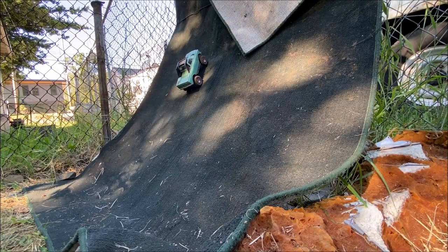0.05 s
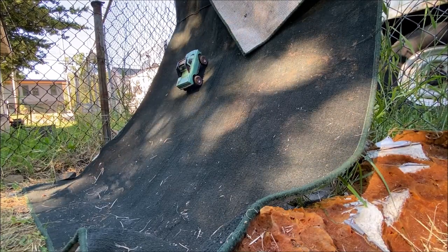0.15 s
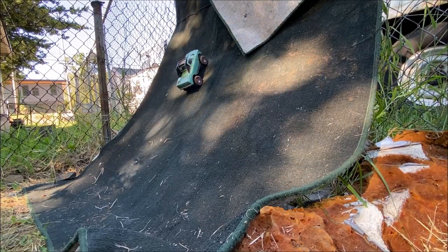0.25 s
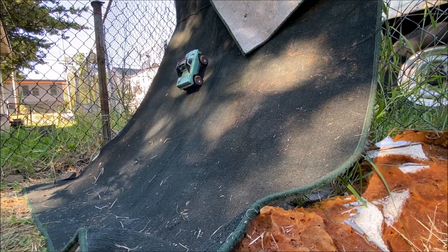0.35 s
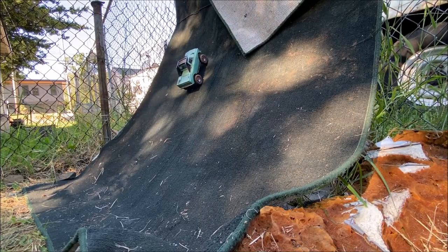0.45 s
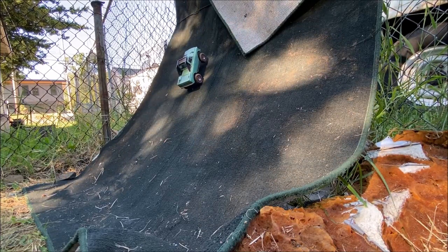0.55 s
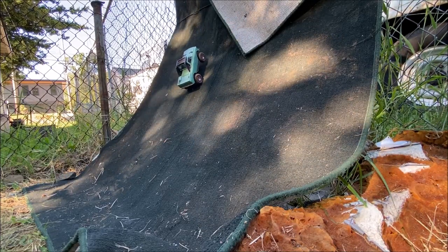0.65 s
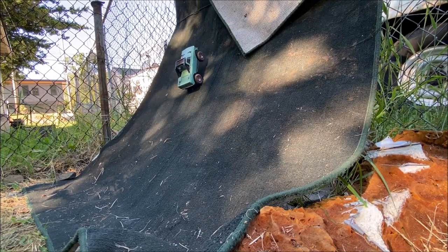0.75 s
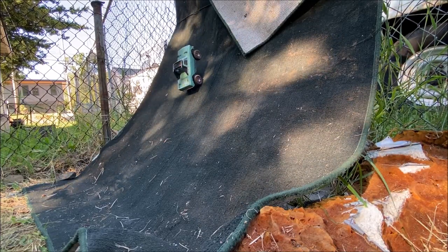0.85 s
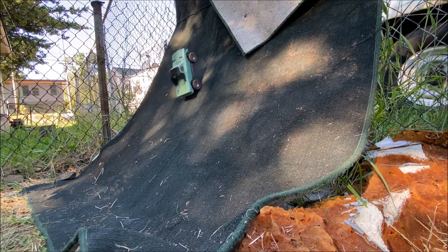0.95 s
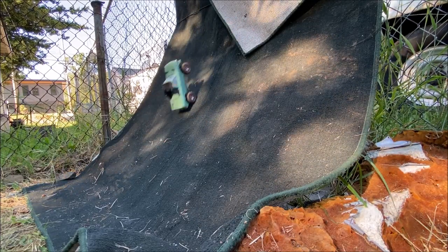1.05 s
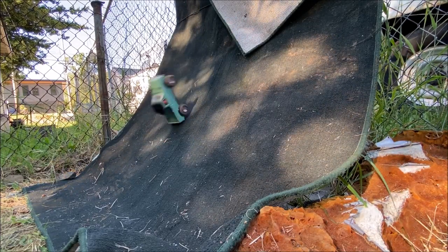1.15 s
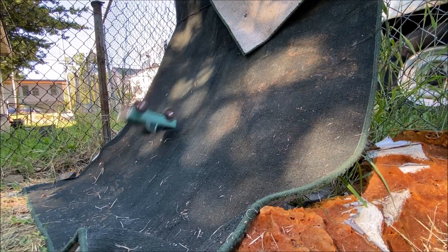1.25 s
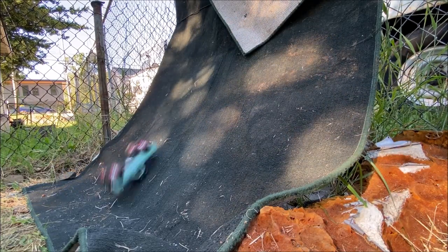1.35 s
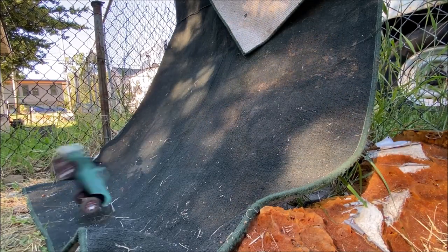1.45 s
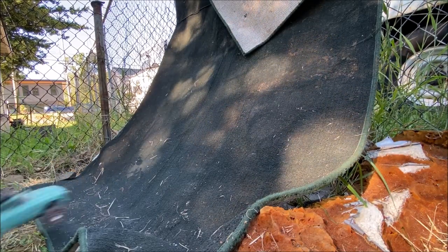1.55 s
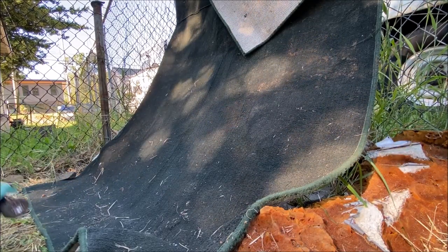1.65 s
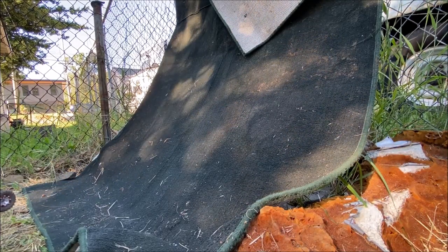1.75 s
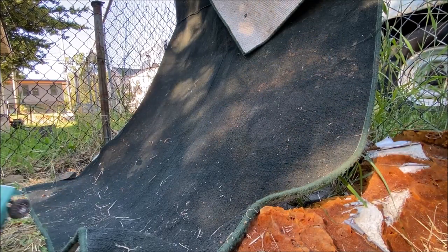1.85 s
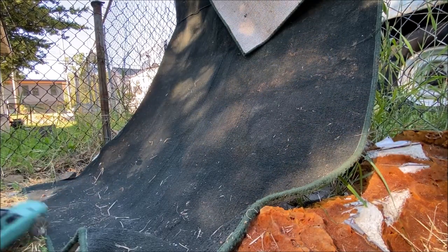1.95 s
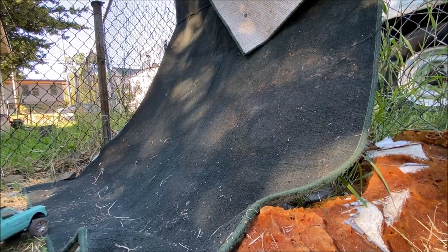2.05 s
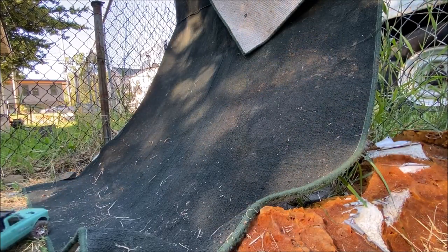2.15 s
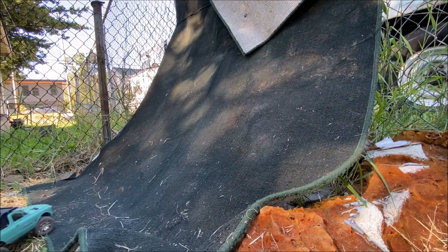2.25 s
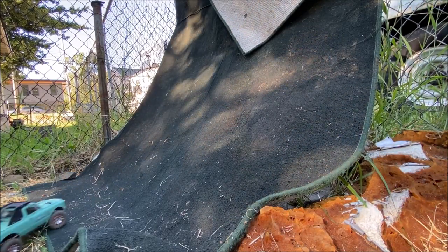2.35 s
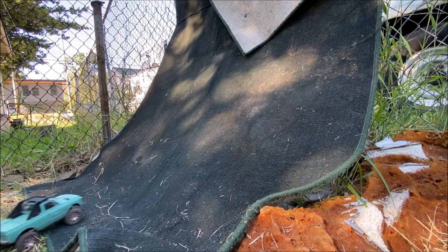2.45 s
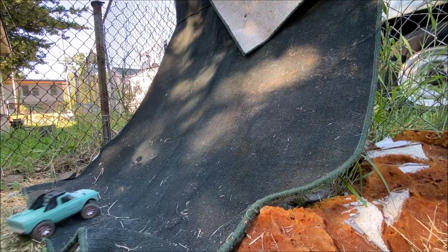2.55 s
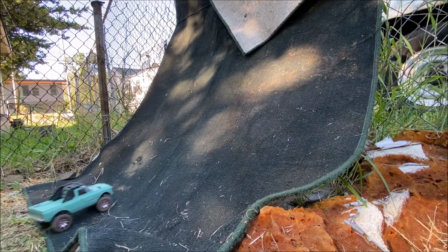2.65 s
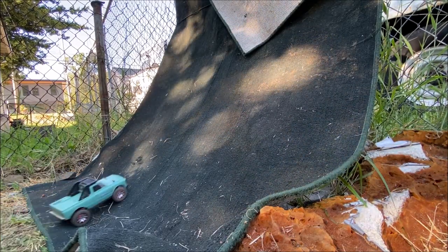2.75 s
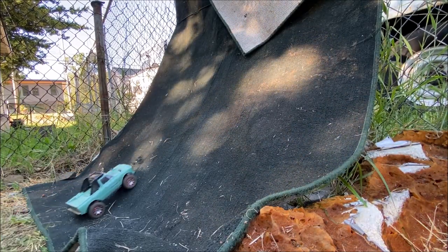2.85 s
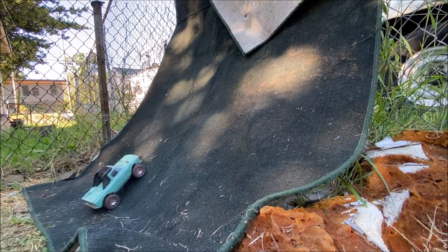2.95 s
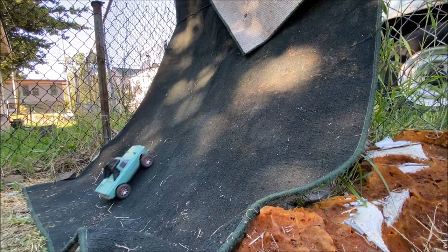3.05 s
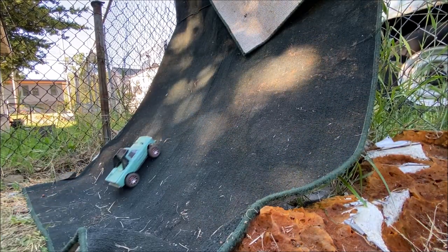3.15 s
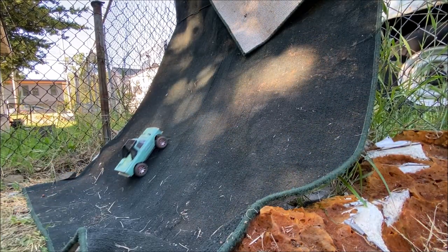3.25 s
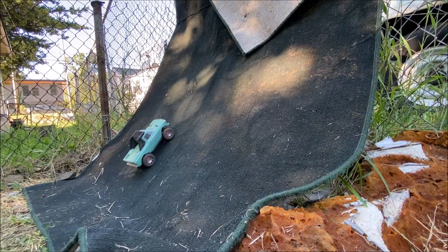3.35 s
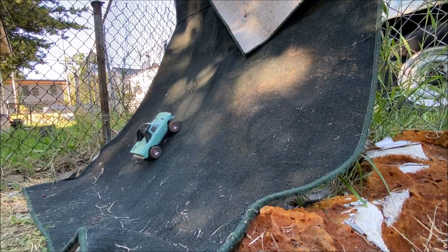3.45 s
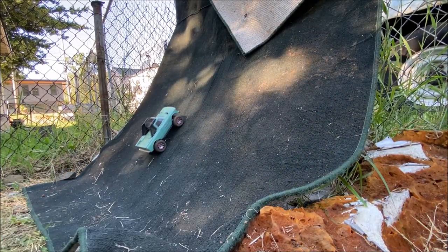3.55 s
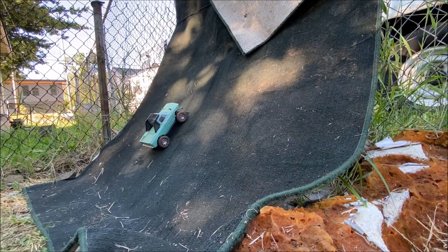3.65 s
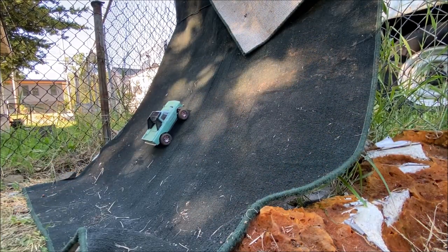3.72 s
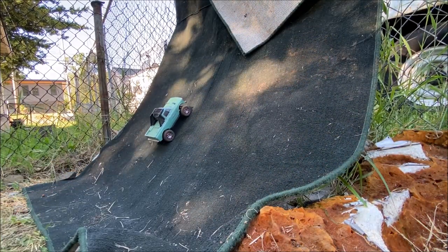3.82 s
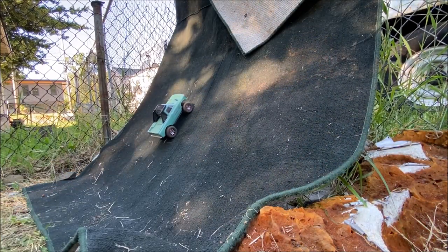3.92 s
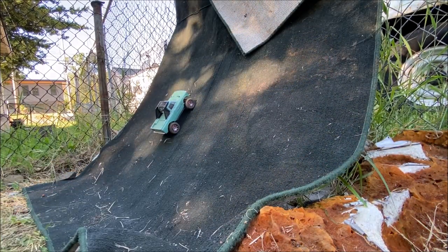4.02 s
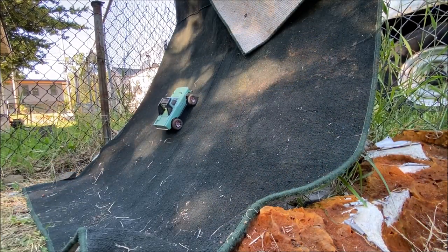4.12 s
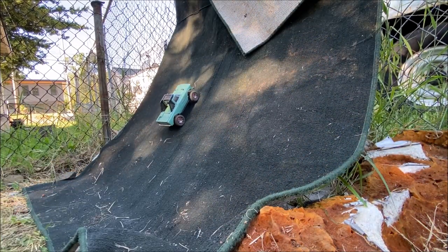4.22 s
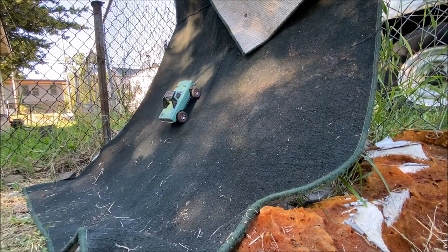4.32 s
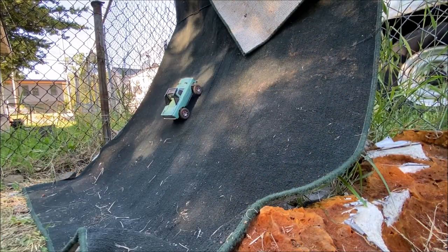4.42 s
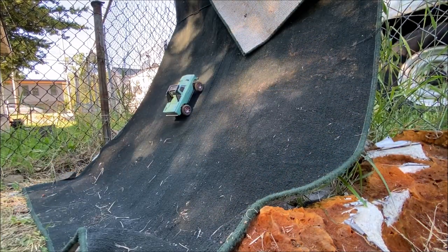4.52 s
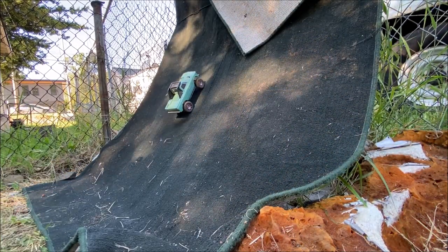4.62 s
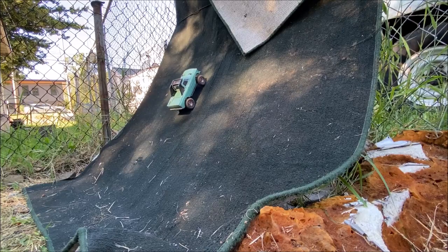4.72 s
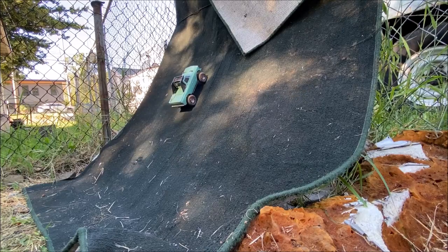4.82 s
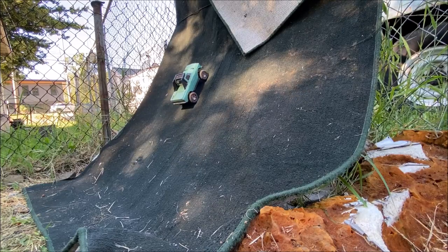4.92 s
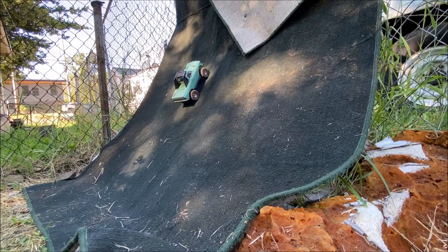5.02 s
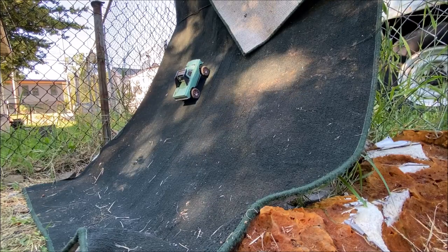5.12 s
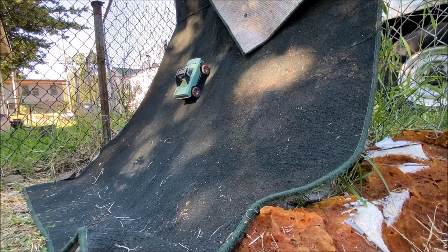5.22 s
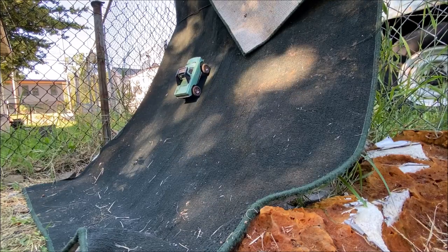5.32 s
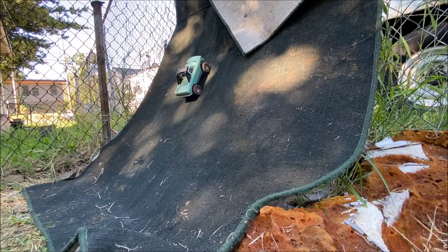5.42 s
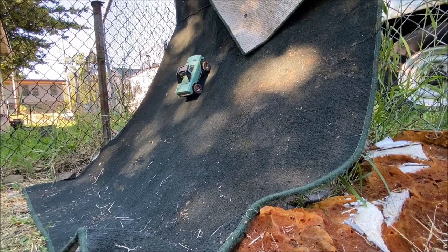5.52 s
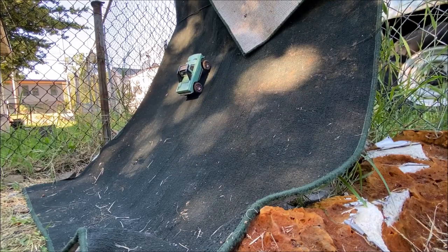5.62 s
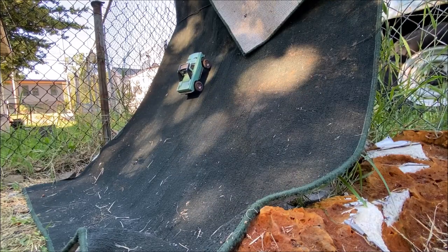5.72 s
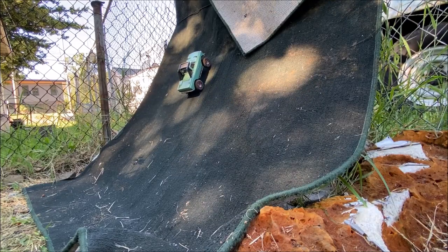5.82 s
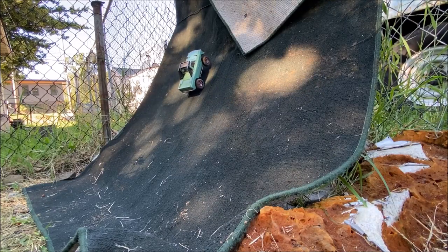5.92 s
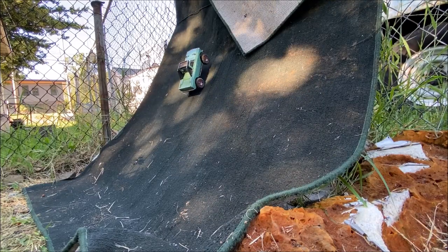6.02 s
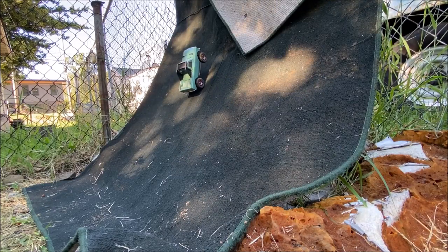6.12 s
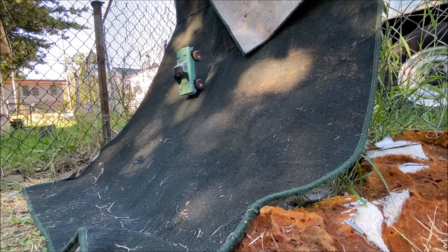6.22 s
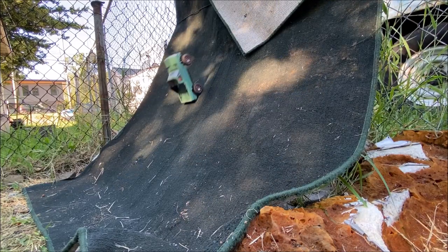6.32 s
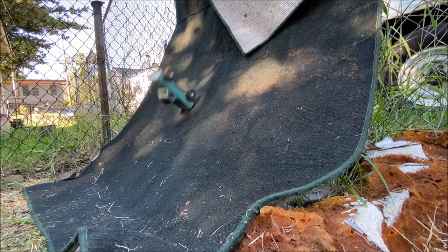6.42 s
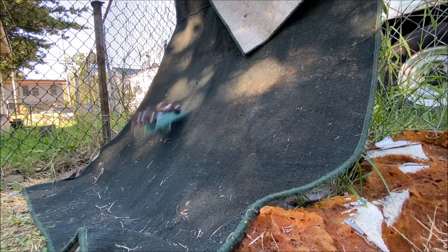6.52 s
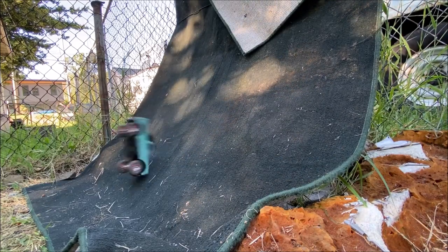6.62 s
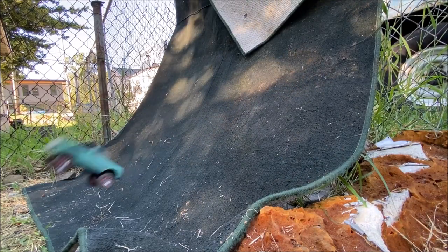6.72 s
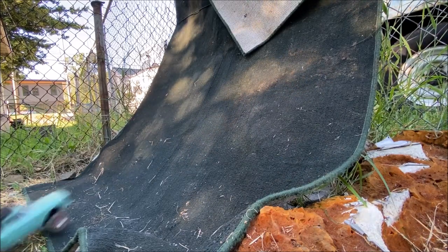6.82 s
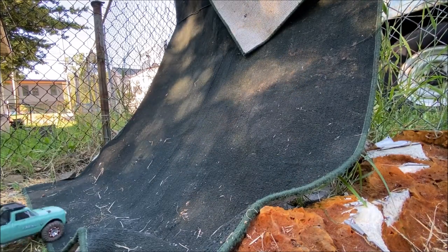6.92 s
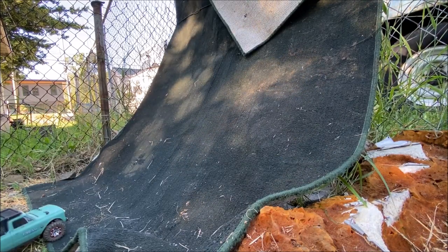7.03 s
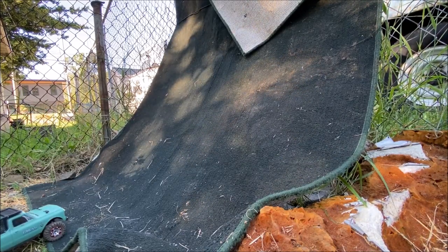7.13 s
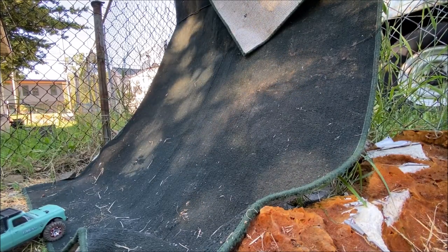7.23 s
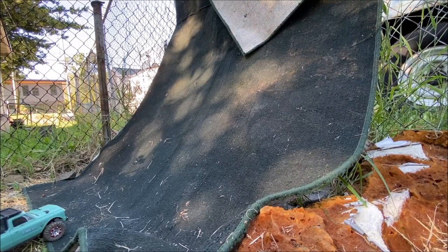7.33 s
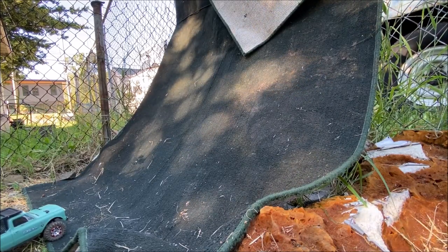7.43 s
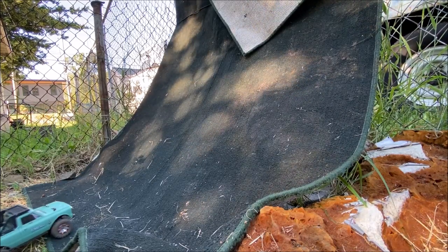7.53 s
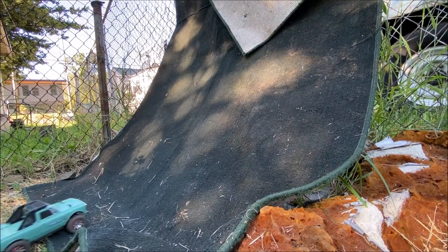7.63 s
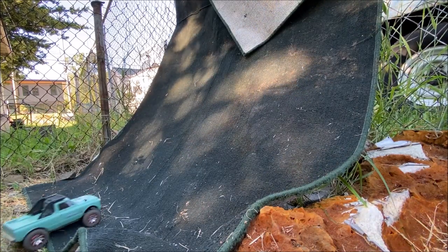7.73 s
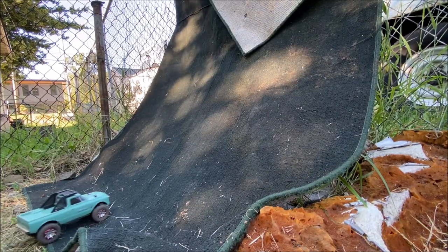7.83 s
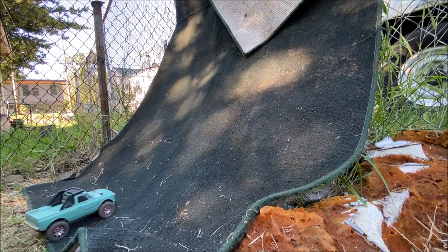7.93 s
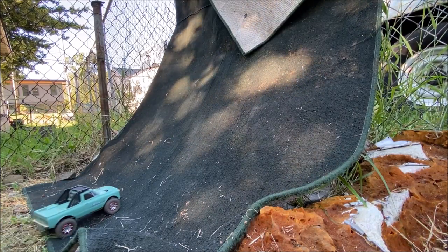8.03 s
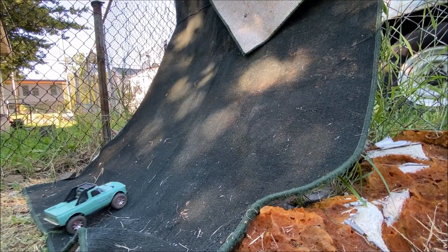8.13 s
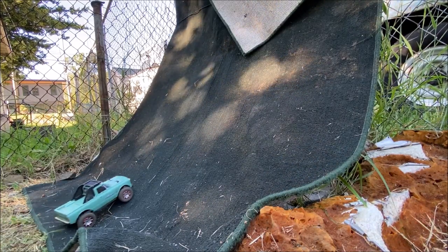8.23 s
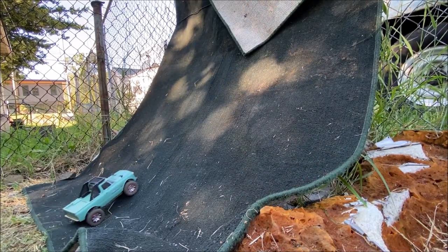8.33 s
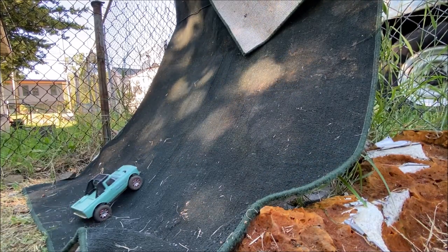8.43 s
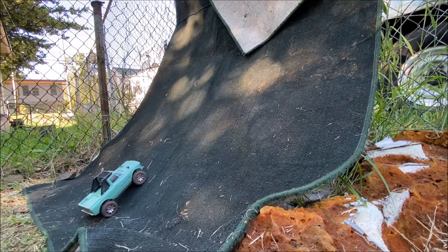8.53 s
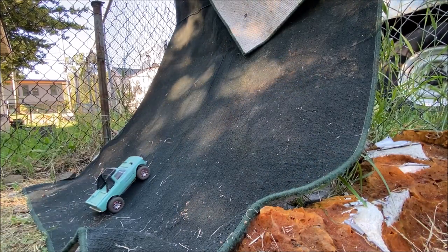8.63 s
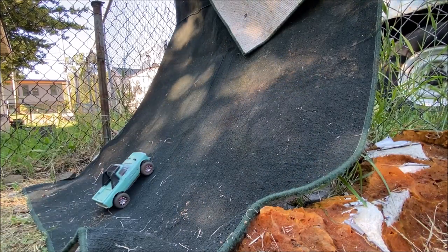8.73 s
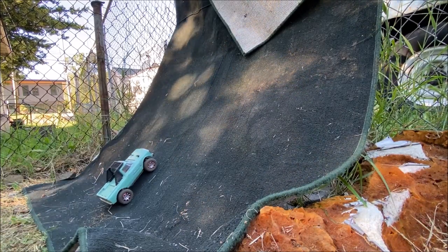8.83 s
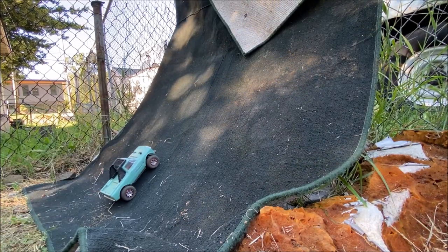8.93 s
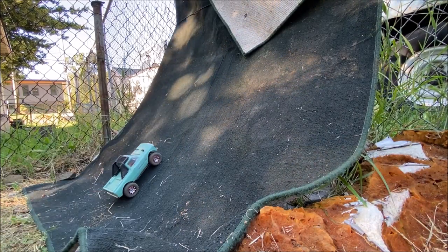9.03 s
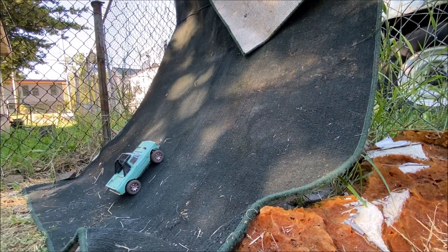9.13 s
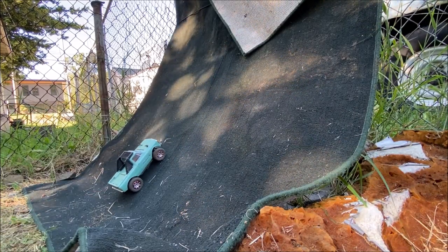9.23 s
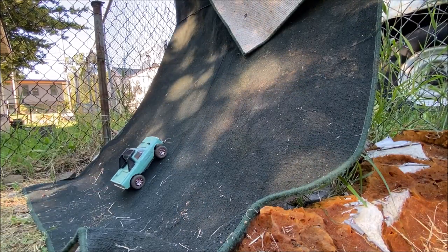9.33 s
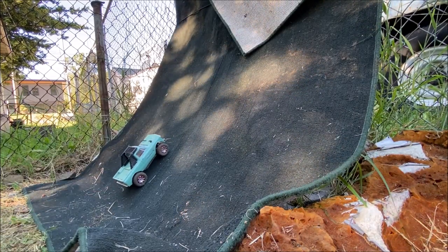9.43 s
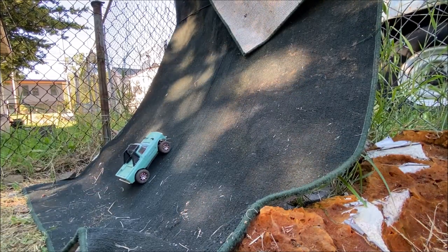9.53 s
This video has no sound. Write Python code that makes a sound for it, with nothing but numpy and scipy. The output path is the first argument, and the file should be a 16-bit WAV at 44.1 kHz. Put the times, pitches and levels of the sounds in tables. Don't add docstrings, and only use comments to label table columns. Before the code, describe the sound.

Low distant traffic rumble with a soft tyre roar and faint engine drones runs throughout, gently swelling. At first there is only faint scraping; around 1.2 s a brief motor whir and buzz, then a toy truck tumbles: sharp plastic cracks and a low tarp thump at 1.44, a harder hollow knock at 1.68, smaller ones at 1.84 and 2.07. From 2.3 s the gear whine spins up fast, bright and rattly, loudest about 3.1-3.5, then falls steeply by 3.7 into a lower, fluttering crawl, stalling near 5.1. Mostly traffic remains until a second fall: a dense, loud burst of cracks, thump and skid hiss at 6.65-6.73, a knock at 6.92, tiny taps to 7.07. At 7.55 the motor kicks and spurts, stumbles near 8.0, rises again around 8.25, then gradually sinks to a low, weak whine by 9.2, continuing to the end at about 9.5.

```python
import sys
import numpy as np
from scipy import signal
from scipy.fft import rfft, irfft, next_fast_len
from scipy.io import wavfile
from scipy.ndimage import uniform_filter1d

SR = 44100
rng = np.random.default_rng(int(sys.argv[2]) if len(sys.argv) > 2 else 0)


def wav_record(signal):
    frames = np.transpose(np.atleast_2d(signal))
    bounded = np.clip(frames, -1, 1)
    quanta = np.round(bounded * 32767).astype(np.int16)
    wavfile.write(sys.argv[1], SR, quanta)


def linear_from_db(decibels):
    return 10 ** (np.asarray(decibels, float) / 20)


N = 422037
TEETH = 11
T = np.arange(N) / SR
FAST = next_fast_len(N)
F = np.maximum(np.fft.rfftfreq(FAST, 1 / SR), 1)


def unit(x):
    return x / np.sqrt(np.mean(x ** 2))


def on_log(table):
    hz, value = np.transpose(table)
    return np.interp(np.log(F), np.log(hz), value)


def ring(x, modes, order=1):
    size = next_fast_len(len(x))
    f = np.maximum(np.fft.rfftfreq(size, 1 / SR), 1)
    gain = 0
    for k, (hz, width, db) in enumerate(modes):
        detune = (f / hz - hz / f) * hz / width
        gain = gain + (-1) ** k * linear_from_db(db) / (1 + 1j * detune)
    return irfft(rfft(x, size) * gain ** order, size)[:len(x)]


def walk(rate):
    k = int(SR / rate)
    steps = np.repeat(rng.standard_normal(N // k + 1), k)
    return 1.3 * uniform_filter1d(uniform_filter1d(steps, k), k)[:N]


def span(start, end):
    return uniform_filter1d(1. * ((T > start) & (T < end)), SR // 40)


def play(tables):
    s, *columns = np.transpose(np.vstack(tables))
    gate = sum((T > t[0][0]) & (T < t[-1][0]) for t in tables)
    return uniform_filter1d(1. * gate, SR // 40), [np.interp(T, s, c) for c in columns]


def bursts(table, edge_s, fade_db):
    out = np.zeros(N)
    for start, end, db, hz, width in table:
        first = int((start - 2 * edge_s) * SR)
        t = T[first:int((end + 2 * edge_s) * SR)]
        rough_db = 4 * rng.standard_normal(len(t) // 64 + 1).repeat(64)[:len(t)]
        grit = rng.standard_normal(len(t)) * linear_from_db(rough_db)
        gate = np.clip(np.minimum(t - start, end - t) / edge_s + .5, 0, 1)
        gate = gate * linear_from_db(-fade_db * (t - start) / (end - start))
        out[first:][:len(t)] += linear_from_db(db) * gate * unit(ring(grit, [(hz, width, 0)], order=2))
    return out


# (frequency [Hz], level per Hz [dB])
ROAD_COLOUR = [(15, -64), (25, -41), (39, -6.5), (97, -2), (137, -2), (270, -7.5), (301, -14.5), (489, -14),
               (775, -17.5), (962, -17), (1440, -26), (2000, -31), (2690, -33.5), (3520, -41.5),
               (7110, -48.5), (16000, -71)]
# (time [s], rumble level [dB])
FLOW = [(0.0, -41.5), (0.13, -41.5), (0.56, -45.5), (1.14, -44.5), (1.33, -42), (3.86, -43), (4.0, -44),
        (6.42, -44.5), (6.79, -42), (7.22, -45.5), (9.19, -46), (9.57, -44)]


def road():
    rumble_db = np.interp(T, *np.transpose(FLOW))
    roar_db = -48.5 + 0.28 * (rumble_db + 43) - 0.3317 * T
    colour = rfft(rng.standard_normal(N), FAST) * linear_from_db(on_log(ROAD_COLOUR))
    rumble = unit(irfft(colour * (F < 300), FAST)[:N])
    roar = unit(irfft(colour * (F >= 300), FAST)[:N])
    return rumble * linear_from_db(rumble_db + 1.3 * walk(8) + 0.6) + roar * linear_from_db(roar_db + 0.78 * walk(6) + 4.05)


# (frequency [Hz], drift [Hz], level [dB], start [s], end [s])
DRONES = [(55.4, 2.52, -52, -6, 11), (78.4, 1.74, -54, 1.3, 4.44), (212, 3.04, -52, 2.5, 5.78),
          (162.3, 0.62, -48.5, 7.5, 11)]


def drones():
    out = 0
    for hz, drift, db, start, end in DRONES:
        hum = np.sin(2 * np.pi * np.cumsum(hz + drift * walk(6)) / SR) * linear_from_db(db + 2.5 + 1.4 * walk(5))
        out = out + hum * np.clip(np.minimum(T - start, end - T) / 0.6, 0, 1)
    return out


# (time [s], tyre hum level [dB], half length [s])
PASSES = [(0.4, -51, .5), (1.94, -51.5, 0.22), (3.447, -53.5, 0.31), (4.2, -54.5, 0.39), (5.501, -55, .4),
          (6.05, -54, .2), (7.54, -58.5, .3)]


def tyre_hum():
    passing = sum(linear_from_db(db) * np.exp(-((T - s) / half) ** 2) for s, db, half in PASSES)
    return unit(ring(rng.standard_normal(N), [(960, 160, 0)], order=2)) * passing * linear_from_db(1.5)


# (time [s], chassis shake [dB], gearbox strain above it [dB])
EFFORT = [
    [(2.1, -71, -12), (2.156, -61.5, -4), (2.246, -70, -3), (2.36, -61.5, 5), (2.464, -61.5, -5),
     (2.776, -60, 0.5), (3.222, -54, -2.5), (3.476, -54.5, -5.5), (3.8, -63.5, -5)],
    [(3.8, -63, -7), (3.998, -65.5, -2), (4.088, -61, -2), (4.326, -65.5, 2), (4.42, -67.5, 8.5),
     (4.954, -68.5, 10), (4.966, -70, 4), (5.082, -70.5, 4), (5.2, -82, -2)],
    [(7.46, -78, -7), (7.55, -66, 2), (7.72, -60.5, -7), (7.9, -68, 4), (7.94, -66, -3), (8.21, -64, -5),
     (8.72, -60.5, 2), (9.26, -72, -6), (9.57, -68, -8)],
]
# (start [s], end [s], shake at start [dB], shake at end [dB], strain above it [dB])
SCRAPES = [(0.47, 0.64, -91, -91, 12), (0.974, 1.19, -67, -67, 0), (1.191, 1.43, -62, -63, -2),
           (1.46, 1.67, -63, -82, -6), (1.72, 2.09, -78, -81, -6), (5.2, 6.339, -79, -82.5, 3),
           (6.36, 6.66, -65.5, -75, -5.5), (6.73, 6.91, -69, -78, -6), (6.97, 7.46, -79, -78, -5)]
# (frequency [Hz], width [Hz], level [dB])
GEARBOX = [(10225, 960, 2), (10660, 690, -4.5), (5190, 550, -10)]
CHASSIS_TOP = [(11090, 1160, 0.5), (12960, 1670, 1.5), (14250, 1800, -1.5)]
CHASSIS_MIDDLE = [(6310, 700, 0), (7060, 670, 1), (7700, 380, 1), (8150, 250, 0.5), (9000, 750, -1)]
CHASSIS_LOWER = [(2490, 1000, -1), (3780, 920, -1), (5060, 710, -2.5), (5780, 710, -1.5)]


def rattle(turns, running, hz):
    scrapes = [[(start, db, strain), (end, end_db, strain)] for start, end, db, end_db, strain in SCRAPES]
    gate, (shake_db, strain_db) = play(sorted(EFFORT + scrapes))
    top_db = shake_db - 3.5 + 3 * running * np.log2(hz / 2000) - 4 * (1 - running)
    lower_db = -66 + 0.54 * (shake_db + 63)
    beat = .5 + np.exp(-np.abs(turns % 1 - .5) / 0.15)
    flaws = rng.standard_normal(size=160)
    repeat = np.interp(turns % 1, np.arange(len(flaws)) / len(flaws), flaws, period=1)
    grit = rng.standard_normal(N) * beat * linear_from_db(1.4 * walk(300)) + 0.83 * running * repeat
    parts = [(GEARBOX, shake_db + strain_db - 2), (CHASSIS_TOP, top_db),
             (CHASSIS_MIDDLE, shake_db - 2.5), (CHASSIS_LOWER, lower_db)]
    out = 0
    for modes, db in parts:
        panels = sum(linear_from_db(m[2] + 1.97 * walk(9)) * unit(ring(grit, [m], order=2)) for m in modes)
        out = out + linear_from_db(db) * unit(panels)
    notch = signal.iirnotch(13350, 11, fs=SR)
    return np.minimum(gate, 1) * signal.filtfilt(*notch, out)


# (start [s], end [s],
# level [dB], frequency [Hz], width [Hz])
BUZZES = [(1.13, 1.25, -68, 10300, 500), (1.23, 1.35, -66, 7300, 400), (1.29, 1.36, -68, 4700, 200),
          (2.44, 2.5, -66, 15200, 500), (2.6, 2.66, -62, 7700, 400), (2.59, 2.67, -64, 15400, 500),
          (2.9, 3.1, -62, 10500, 500), (3.05, 3.5, -59, 11250, 450), (3.05, 3.5, -66, 6300, 250),
          (7.87, 8.13, -63, 4450, 600), (7.93, 8.09, -67, 8100, 400), (8.7, 9.0, -70, 4650, 250),
          (8.95, 9.6, -74, 5000, 180), (9.1, 9.6, -76, 4200, 200)]


def gear_buzz():
    return linear_from_db(-3) * bursts(BUZZES, edge_s=.03, fade_db=2)


# (time [s], crack peak [dB], shell level above it [dB])
KNOCKS = [(1.2158, -44.5, 0), (1.4392, -25, -3), (1.4508, -33, 1), (1.459, -39, 1), (1.4702, -38, 3),
          (1.4834, -36, -8), (1.4965, -34, -8), (1.516, -39, -16), (1.6794, -19, 1), (1.6892, -27, 0.5),
          (1.6945, -33, 3), (1.7007, -27, -16), (1.833, -39, -10), (1.8393, -35.5, -7), (1.8757, -46, -8),
          (1.9094, -56, 14), (2.0657, -22.5, -13), (6.566, -52, -10), (6.5894, -45, -7), (6.6545, -32, -3),
          (6.6645, -24.5, -2), (6.6754, -17, -8), (6.6868, -28, 0), (6.6935, -29, -4), (6.7115, -32, -20),
          (6.722, -35, -20), (6.9158, -17.5, -3), (6.9187, -21, -5), (6.9254, -25, -5), (6.9382, -31, 1),
          (6.964, -42, -14), (7.001, -44.5, -8), (7.0455, -56, -10), (7.0735, -46.5, -11)]
# (frequency [Hz], width [Hz], level [dB])
CRACK = [(2560, 900, 3), (3640, 1500, 0.5), (5100, 1600, 0), (6600, 760, -1.5), (7800, 1900, -4),
         (10800, 2700, -7.5), (14600, 3800, -9.5)]
# (frequency [Hz], width [Hz], level [dB])
SHELL = [(360, 130, 2), (560, 260, 2), (760, 250, 1), (1150, 440, 2), (1750, 1000, 1)]


def knocks():
    out = np.zeros(N)
    t = T[:8192]
    for s, db, shell_db in KNOCKS:
        t60 = .03 + .0003 * (db + 29.5)
        fade = 0.33 * np.exp(-np.log(1000) * t / t60) + 1.18 * np.exp(-t / 0.0013)
        fade = fade * (1 - np.exp(-t / 0.0028))
        crack = ring(fade * rng.standard_normal(len(t)), CRACK)
        shell = ring(fade * rng.standard_normal(len(t)), SHELL)
        blow = linear_from_db(-2) * crack / np.abs(crack).max() + linear_from_db(shell_db + 6) * shell / np.abs(shell).max()
        out[int(s * SR):][:len(t)] += linear_from_db(db) * blow
    return out


# (time [s], tooth rate [Hz], load on the teeth [dB])
FIRST_CLIMB = [
    [(1.22, 2380, -74), (1.3, 2300, -67), (1.42, 2250, -74)],
    [(2.29, 1750, -74), (2.33, 2150, -72), (2.39, 3130, -72)],
    [(2.39, 3129, -70), (2.47, 3669, -60), (2.57, 4101, -66), (2.62, 3800, -57), (2.69, 4180, -62),
     (2.79, 4420, -62), (2.84, 4870, -72)],
    [(2.84, 4880, -72), (2.93, 4636, -60.5), (3.13, 4450, -59), (3.16, 4245, -55), (3.25, 4407, -54),
     (3.38, 4304, -51.5), (3.45, 3780, -55.5), (3.5, 3570, -64)],
    [(3.5, 3570, -64), (3.55, 3300, -66), (3.6, 2900, -67), (3.65, 2420, -67), (3.71, 2007, -62)],
    [(3.71, 2009, -62), (3.86, 1832, -66), (4.0, 1880, -64), (4.12, 2080, -66), (4.21, 1990, -66),
     (4.33, 1823, -65), (4.6, 1810, -66), (4.75, 1850, -66), (4.82, 1800, -66)],
    [(4.82, 1800, -68), (4.88, 1750, -65), (4.96, 1720, -66), (5.03, 1420, -78), (5.13, 1350, -76)],
]
SECOND_CLIMB = [
    [(7.54, 1450, -74), (7.56, 1550, -67), (7.595, 2300, -69)],
    [(7.595, 2300, -60), (7.65, 2960, -58), (7.7, 3174, -59), (7.73, 2900, -58), (7.76, 3110, -61),
     (7.85, 2600, -61), (7.87, 2198, -66)],
    [(7.87, 2250, -62), (7.9, 1764, -66), (7.95, 1660, -72)],
    [(7.95, 1560, -71), (7.97, 1530, -65), (8.0, 1450, -62), (8.04, 1540, -65), (8.06, 1620, -67),
     (8.11, 1817, -68)],
    [(8.11, 1817, -70), (8.18, 2297, -71), (8.26, 2574, -66), (8.4, 2312, -64.5), (8.61, 2020, -70),
     (8.68, 2120, -72.5), (8.79, 1900, -64), (8.91, 1380, -70), (9.16, 1029, -72)],
    [(9.16, 1028, -67), (9.25, 1003, -65), (9.57, 1045, -66)],
]
THROTTLE = FIRST_CLIMB + SECOND_CLIMB


def motor_shaft():
    running, (hz, load_db) = play(THROTTLE)
    crawl = np.clip(1 - hz / 2600, 0, .33)
    turns_per_lug = 10.5
    lug = (np.cumsum(hz * (1 + .2 * walk(12))) / SR / TEETH / turns_per_lug) % 1 - .5
    flutter = (.005 + .045 * crawl) * walk(70) + 0.01 * walk(250) + .035 * 3 * crawl * lug
    turns = np.cumsum(hz * (1 + flutter)) / SR / TEETH
    return turns, running, hz, load_db + 3.5 * 6 * crawl * lug


# (tooth tone [dB], 2nd multiple [dB], 3rd multiple [dB])
OVERTONES = [(0, -12, -20), (-14, 0, -16), (0, -9, -18), (0, -4, -20), (-6, -2, -16), (1, -7, -10),
             (-1, -7, -8), (-12, -2, -16), (-3, -18, -28), (-12, -1, -18), (-14, -7, -6), (-6, -4, -15),
             (-2, -4, -14)]
# (frequency [Hz], width [Hz], lift [dB])
CASING = [(2529, 200, 4), (4370, 470, 8), (5200, 200, 5), (6150, 200, 3), (7750, 300, 5), (8800, 350, 4)]
# (order [turns of the shaft], level under the tooth tone [dB])
SIDE_ORDERS = [(5, -15.5), (10, -12), (12, -24), (28, -20), (32, -21), (38, -22), (44, -20)]


def casing_lift(hz, modes):
    return sum(db * np.exp(-((hz - centre) / width) ** 2) for centre, width, db in modes)


def pinion(turns, hz, load_db):
    phase = np.searchsorted([run[-1][0] for run in THROTTLE[:-1]], T)
    above_db = uniform_filter1d(np.array(OVERTONES, float)[phase], SR // 20, axis=0).T
    out = 0
    for multiple, db in enumerate(above_db, 1):
        lift_db = casing_lift(multiple * hz, CASING[:1] if multiple == 1 else CASING[1:])
        waver_db = 2.9 * walk(60) + 1.6 * walk(14)
        tone = np.sin(2 * np.pi * TEETH * multiple * turns)
        out = out + linear_from_db(load_db + db + lift_db + waver_db) * tone
    side_db = load_db + .7 * (load_db + 54.5) + above_db[0]
    for order, db in SIDE_ORDERS:
        out = out + linear_from_db(side_db + db + 3.5 * walk(40)) * np.sin(2 * np.pi * int(order) * turns)
    return out


# (start [s], end [s], order [turns of the shaft], level [dB])
IDLER_MESH = [(8.14, 8.399, 15, -73), (8.399, 8.75, 17, -72), (7.6, 7.655, 18, -70)]


def idler(turns):
    return sum(span(start, end) * linear_from_db(db) * np.sin(2 * np.pi * round(order) * turns)
               for start, end, order, db in IDLER_MESH)


# (frequency [Hz], level [dB])
RADIATION = [(1000, 7), (1900, 0), (2400, 6), (3000, 1.5), (3800, 5.5), (4400, 2), (5200, -3), (6000, 3),
             (8800, 2.5), (13000, 2)]


def whine(turns, running, hz, load_db):
    tones = np.sqrt(2) * (running * pinion(turns, hz, load_db) + idler(turns))
    return irfft(rfft(tones, FAST) * linear_from_db(on_log(RADIATION)), FAST)[:N]


# (time [s], peak [dB], frequency [Hz], t60 [s])
THUMPS = [(1.4535, -23, 97, 0.26), (1.496, -36, 88, 0.3), (1.69, -38.5, 83.4, 0.14),
          (6.677, -28, 140, 0.12), (6.68, -17.5, 96, 0.14), (6.912, -38.5, 150, 0.28),
          (1.439, -28, 847, .05), (1.451, -33, 430, .05), (1.681, -23, 362, 0.083),
          (1.681, -25, 600, 0.078), (1.839, -37, 3200, .015), (2.066, -32, 727, .05),
          (6.654, -33, 450, .05), (6.675, -28, 440, .07), (6.676, -28, 950, .05), (6.684, -26, 1260, .05),
          (6.915, -22, 690, .06), (6.919, -26, 370, .05), (1.679, -26, 1810, .03), (6.666, -28, 1720, .04)]
# (time [s], peak [dB], frequency [Hz], t60 [s])
PINGS = [(1.4405, -32, 4600, .02), (1.4495, -36, 4000, .02), (1.4965, -38, 4070, .015),
         (1.513, -47, 11200, .008), (1.5175, -47, 11000, .012), (1.6795, -31, 6340, .018),
         (1.679, -33, 10800, .02), (1.6895, -30, 6400, .015), (1.7005, -33, 6000, .012),
         (1.8395, -42, 5500, .015), (2.067, -33, 6800, .02), (2.068, -36, 5400, .03),
         (6.654, -34, 3600, .015), (6.665, -31, 4440, .015), (6.6765, -26, 4400, .015),
         (6.678, -28, 6200, .02), (6.693, -33, 10500, .012), (6.694, -33, 3700, .015),
         (6.7127, -36, 6280, .018), (6.729, -41, 3200, .015), (6.9155, -29, 2690, .02),
         (6.9205, -28, 6800, .02), (6.9635, -43, 3500, .012), (7.001, -50, 3230, .012)]


def thumps_and_pings():
    out = np.zeros(N)
    t = T[:8192]
    for s, db, hz, t60 in THUMPS + PINGS:
        fade = np.exp(-np.log(1000) * t / t60) * (1 - np.exp(-t * hz * 1.9))
        out[int(s * SR):][:len(t)] += linear_from_db(db) * np.sin(2 * np.pi * hz * t) * fade
    return out


# (start [s], end [s], level [dB], frequency [Hz], width [Hz])
SKIDS = [(1.445, 1.52, -50, 4000, 3000), (1.468, 1.49, -43, 1500, 900), (1.53, 1.6, -62, 4000, 800),
         (1.668, 1.69, -59, 6000, 9000), (1.682, 1.725, -47, 7000, 9000), (6.678, 6.71, -40, 4000, 6000),
         (6.697, 6.74, -53, 5500, 6000), (6.905, 6.93, -57, 7000, 8000), (6.93, 6.965, -45, 4000, 7000),
         (6.96, 7.0, -64, 5000, 7000)]


def skids():
    return bursts(SKIDS, edge_s=.004, fade_db=12)


# (frequency [Hz], share [0-1])
PORT_SHARED = [(60, 1), (250, 0.91), (700, 0.63), (2000, 0.56), (8000, 0.32), (10000, 0.99), (13000, 0.76),
               (16000, 0.78)]
# (frequency [Hz], left minus right [dB])
PORT_BALANCE = [(60, 3), (110, -2.5), (200, 1.5), (380, -0.5), (700, 6.5), (1290, -0.5), (2380, 1),
                (4400, 5), (8120, 0.5), (15000, -4)]


def ports(x, lead, pan_db, smear_s, spread):
    share = np.clip(on_log(PORT_SHARED), 0, 1) ** spread
    phase = np.interp(F, *np.transpose(lead))
    balance_db = on_log(PORT_BALANCE) + pan_db
    out = []
    for sign in (1, -1):
        echoes = rng.standard_normal(N) * np.exp(-T / smear_s)
        own = rfft(echoes / np.sqrt(np.sum(echoes ** 2)), FAST)
        gain = np.sqrt(share) * np.exp(1j * phase * (sign > 0)) + np.sqrt(1 - share) * own
        out.append(irfft(rfft(x, FAST) * gain * linear_from_db(sign * balance_db / 2), FAST)[:N])
    return np.array(out)


# (frequency [Hz], lead [radians])
TRAFFIC_LEAD = [(0, 0), (520, 2.5), (1120, 3.0), (2670, 7), (22050, 59)]
RATTLE_LEAD = [(0, 0), (340, 1.0), (450, 2.6), (600, 2.2), (1300, 3.3), (2300, 3.7), (4400, 5.9),
               (6400, 12.6), (8350, 15.5), (9900, 7.6), (11250, 6.3), (15000, 0), (16400, 0)]
WHINE_LEAD = [(1000, 3.4), (1900, 1.08), (2500, 3.97), (3100, 4.6), (3750, 3.74), (4300, 5.4), (8800, 9),
              (13000, 4)]
# (frequency [Hz], lead [radians])
RAMP_LEAD = [(0, 0), (370, .5), (700, 1.2), (2000, 1.9), (4000, 4.7), (8000, 7.8), (10500, 6.5),
             (13500, 8.2), (22050, 8.6)]
FOOT_LEAD = [(0, 0), (520, 2.1), (1200, 2.7), (2000, 3.8), (4000, 8), (6300, 12.5), (8000, 13.5),
             (10500, 14.3), (13500, 14.9), (22050, 15)]
# (start [s], end [s])
AT_FOOT = [
    (1.63, 2.3),
    (6.85, 7.3),
]


def scene():
    traffic = ports(road() + drones() + tyre_hum(), TRAFFIC_LEAD, 0.11, 0.29, 1.67)
    turns, running, hz, load_db = motor_shaft()
    chassis = linear_from_db(5) * (rattle(turns, running, hz) + gear_buzz())
    car = ports(chassis, RATTLE_LEAD, 0.53, 0.033, 0.76)
    car = car + ports(linear_from_db(3) * whine(turns, running, hz, load_db), WHINE_LEAD, 0.45, 0.024, 0.19)
    blows = linear_from_db(3) * (knocks() + thumps_and_pings() + skids())
    foot = sum(span(*s) for s in AT_FOOT)
    falls = ports(blows * (1 - foot), RAMP_LEAD, 2.0, 0.0025, 0.1)
    falls = falls + ports(blows * foot, FOOT_LEAD, 3.5, 0.0025, 0.1)
    return traffic + car + falls


def low_pass(x):
    return signal.sosfilt(signal.butter(12, 16830, fs=SR, output="sos"), x)


def record(dry):
    rounded = np.tanh(1.5 * dry) / 1.5
    top_cut = signal.ellip(10, .2, 70, 15650, fs=SR, output="sos")
    mix = signal.sosfilt(top_cut, rounded)
    return low_pass(mix)


dry = scene()
out = record(dry)
wav_record(out)
```